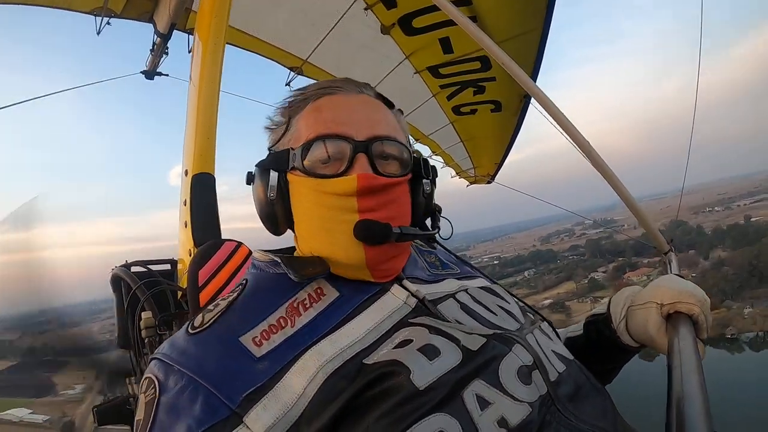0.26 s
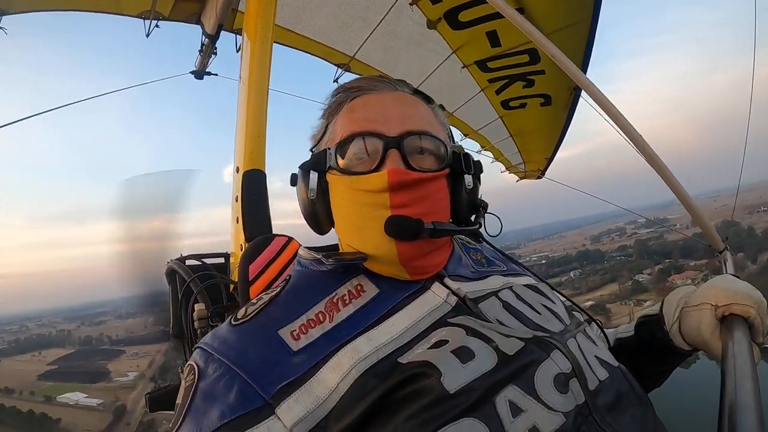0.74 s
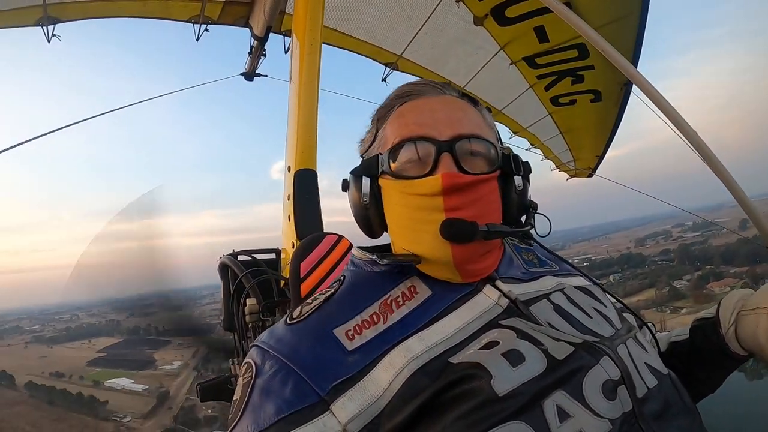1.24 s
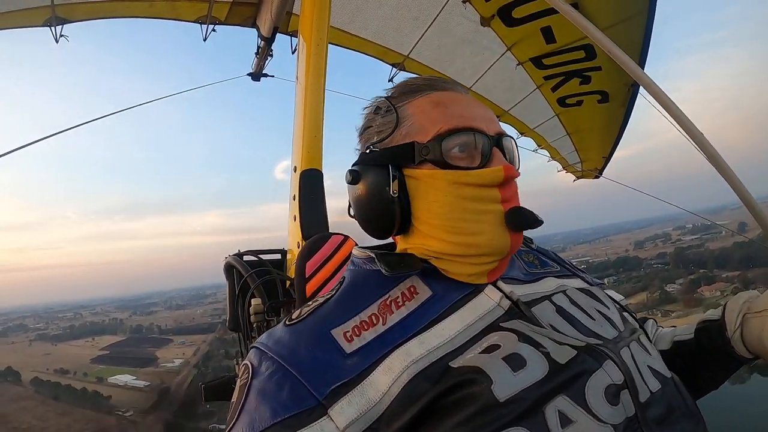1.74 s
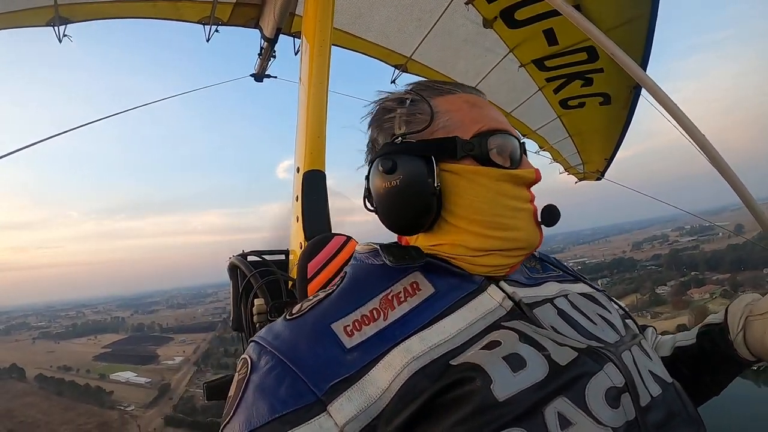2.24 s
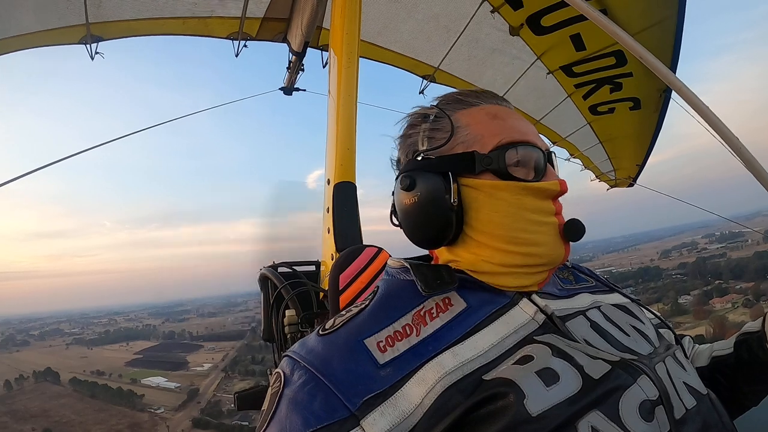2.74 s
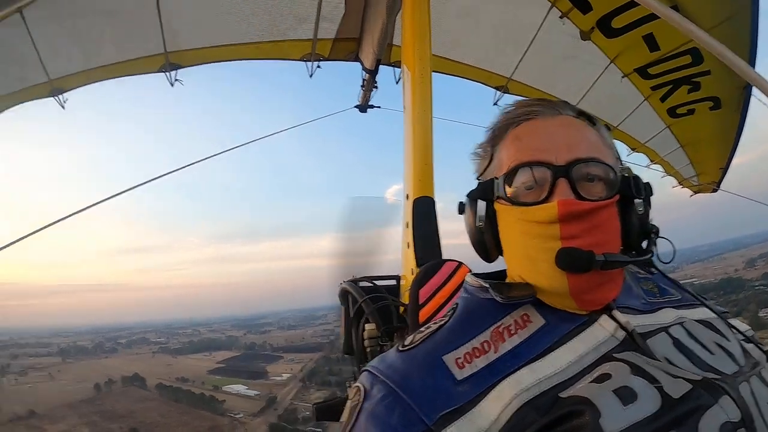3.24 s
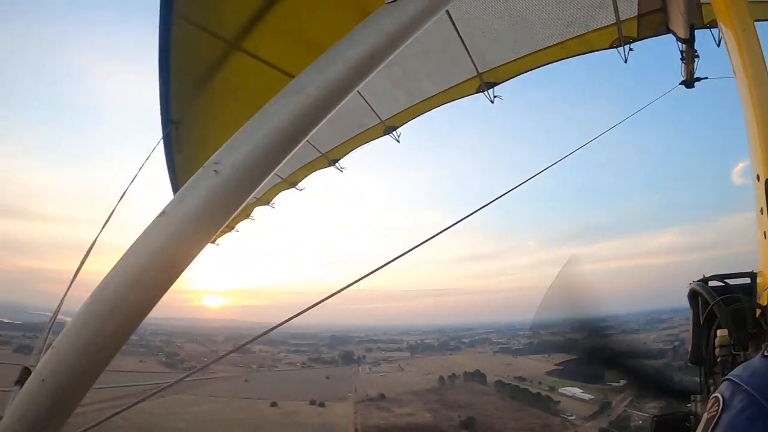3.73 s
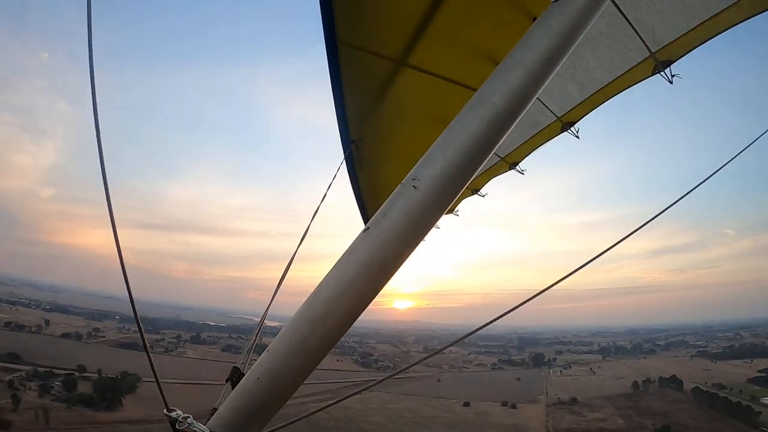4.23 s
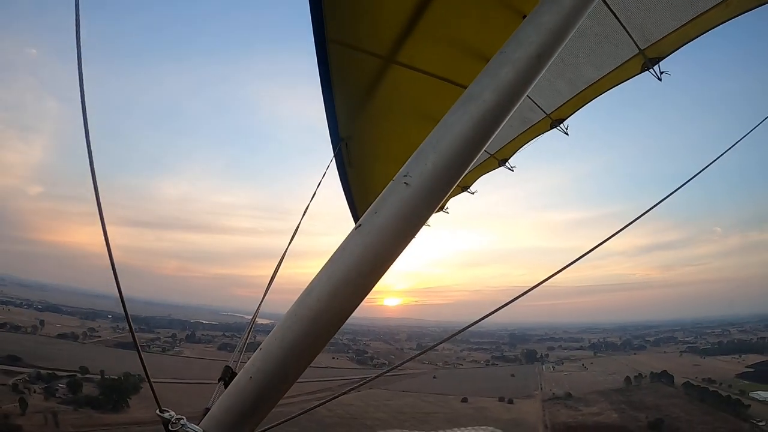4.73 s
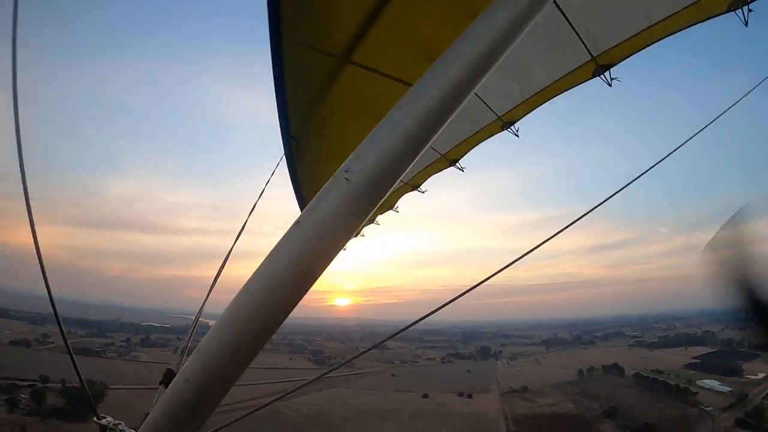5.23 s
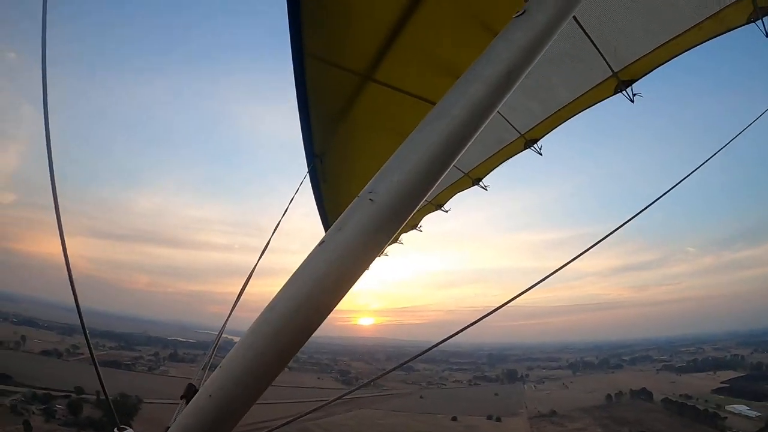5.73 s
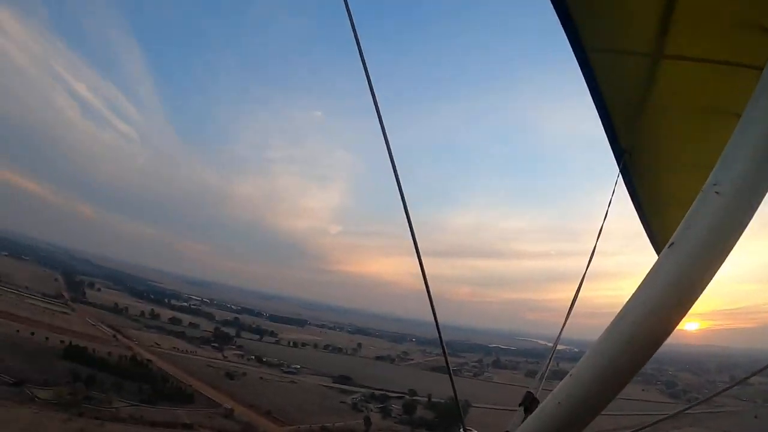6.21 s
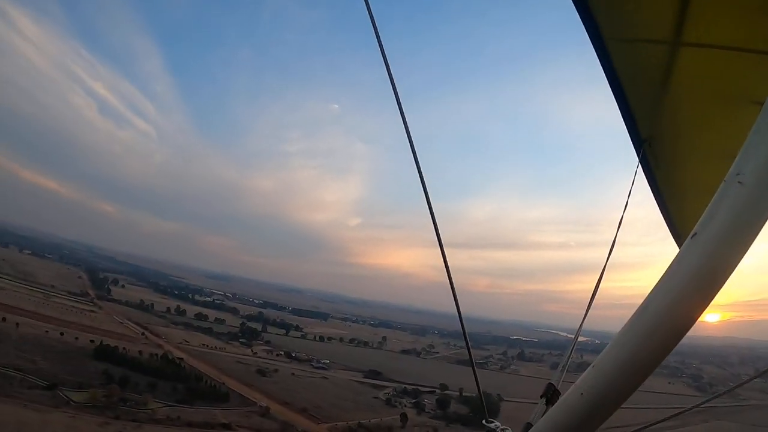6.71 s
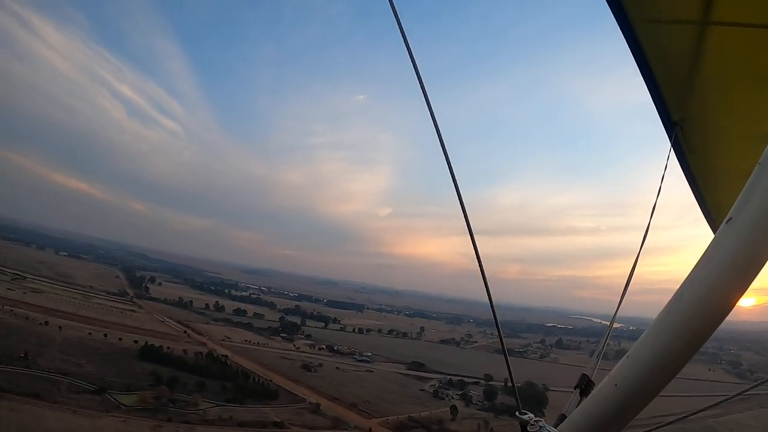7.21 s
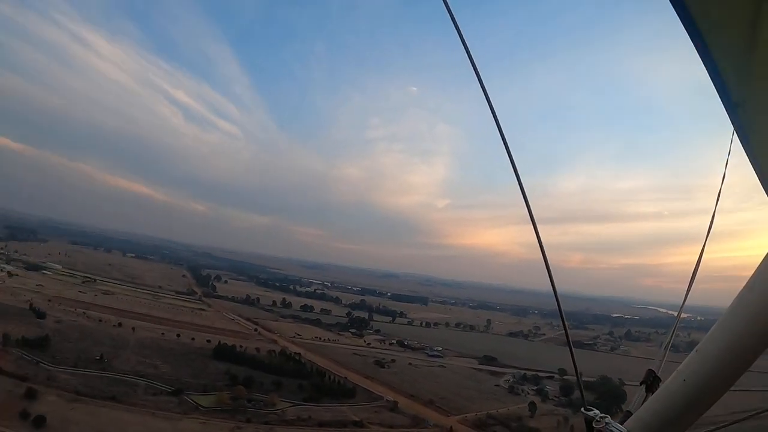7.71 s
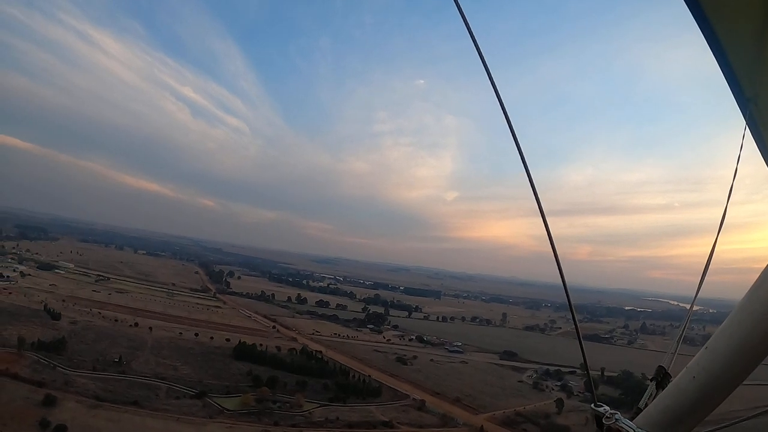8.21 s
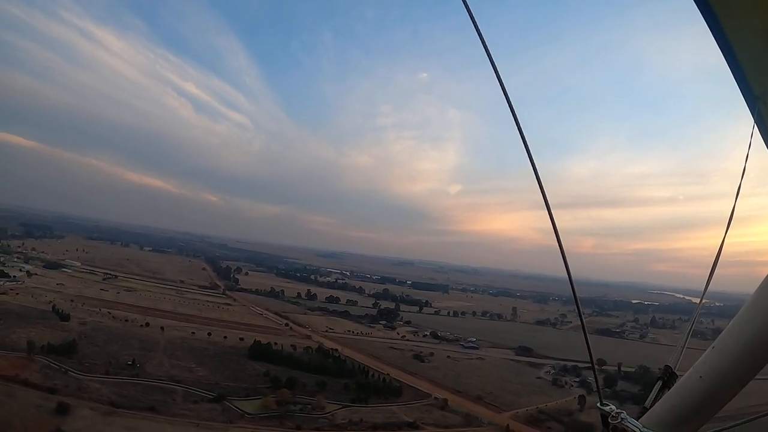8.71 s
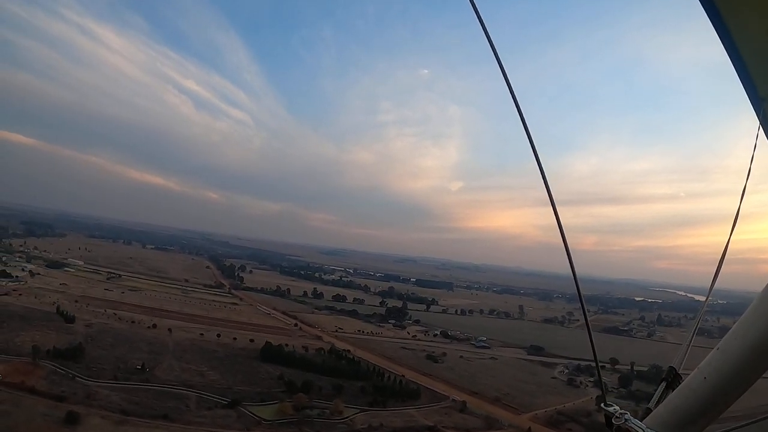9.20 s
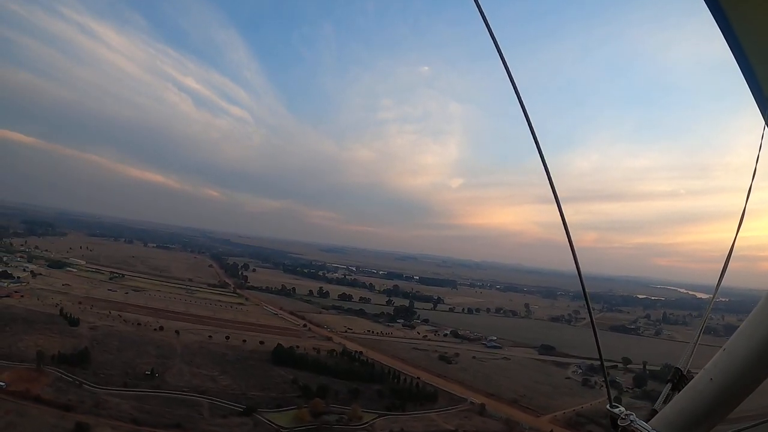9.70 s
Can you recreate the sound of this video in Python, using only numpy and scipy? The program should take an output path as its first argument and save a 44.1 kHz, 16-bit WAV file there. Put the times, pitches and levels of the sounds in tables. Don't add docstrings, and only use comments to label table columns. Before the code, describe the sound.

From 0 to about 10 seconds a two-stroke aircraft engine holds a smooth low hum near 100 hertz, sagging very slightly, with faint propeller tones. Over it, dense bassy wind roars and flutters on a bare hand-held camera microphone, with a wavering hollow howl around 160 hertz. Small dry mount ticks come in the first second, then a creaky cluster from 2.0 to 2.6, with more near 3.3 to 3.9. As the camera swings, tiny high whistles flick by at 3.5 to 4.0 and airy slot singing rises around 4.3 to 4.5. At 5.24 to 5.4 a hand rubs and bumps the housing, ending in the heaviest dull thud. Thin singing and short whistles follow until about 6.4, with ticks to 6.7. Then a breathy mid-pitched slot tone joins the drone, and the wind rush thins slightly toward the end, everything held level by gain control.

```python
import sys
import numpy as np
from scipy import signal
from scipy.fft import rfft, irfft, next_fast_len
from scipy.io import wavfile

SR = 44100
rng = np.random.default_rng(int(sys.argv[2]) if len(sys.argv) > 2 else 0)


def nominal_scale(level):
    x = np.asarray(level, float) / 20
    return 10 ** x


def store_wav(level_fs):
    pcm = np.round(np.clip(np.atleast_2d(level_fs), -1, 1) * 32767)
    wavfile.write(sys.argv[1], SR, pcm.T.astype(np.int16))


N = 438794

# time_s, heading_deg
HEADING = [(0, 3.2), (1, 18.4), (2, 26.6), (2.6, 41), (3.5, 50.6), (4, 62), (4.55, 86), (5, 94), (5.3, 94),
           (5.6, 108), (5.95, 131), (6.5, 138), (7, 122), (7.5, 140), (8, 152), (8.5, 158), (9, 173),
           (9.95, 174)]
BEARINGS = (0, 45, 90, 135, 180)
# time_s, flow_db (re cruise), blow_db (across the cavity)
FLOW = [(0, 1.5, -21), (0.5, 0.5, -15), (1.3, -0.5, -16), (1.58, 0.5, -21.5), (1.75, 1.5, -14.5),
        (3.2, 1, -17.5), (4.0, 2, -17), (4.55, 1, -11.5), (5.2, 2.5, -11.5), (5.45, 0.5, -19),
        (5.85, 0.5, -14), (6.45, 0.5, -14.5), (8.3, -0.5, -17), (8.52, -1.5, -10), (8.87, -1.5, -17.5),
        (9.32, -2.5, -21.5), (9.5, -4.5, -12), (9.95, -4.5, -17.5)]
# aft_db, rear_quarter_db, side_db, front_quarter_db, ahead_db
BUFFET_DB = (-26.5, -23, -19, -19.5, -22)
ROAR_DB = (-24.5, -24, -24, -22.5, -22.5)
RUSH_DB = (-28.5, -28, -28.5, -27, -26)
HISS_DB = (-42.5, -41.5, -43.5, -42.5, -41.5)
# pitch_hz, density_db
AIR_COLOUR = [(15, -27), (50, -8.5), (80, -7), (140, -2), (190, -12), (340, -22.5), (600, -21),
              (880, -26.5), (1600, -26.5), (2180, -41.5), (3500, -49.5), (7000, -55), (7700, -79),
              (16000, -93.5)]
# pitch_hz, width_hz, peak_db (over the colour)
PORTS = [(439.5, 90, 7), (720, 76, 1.5), (1115, 205, 9.5), (3003, 940, 9), (4183, 410, 10),
         (4870, 200, 6.5), (5350, 170, 5.5), (7440, 390, 3), (12300, 1900, 12.5)]
HOWL_HZ = (168, 167, 155, 153.75, 155.7)
# pitch_hz, width_hz, level_db
NARROW_SLOTS = [(4180, 350, 0), (4850, 280, -4), (5360, 250, -6), (7000, 500, -10)]
# peak_s, half_length_s, rise_db
SINGS = [
    (4.301, .06, 13),
    (4.48, 0.2, 14),
    (5.6, .6, 7),
    (6.049, 0.36, 10.5),
]
# start_s, length_s, start_hz, end_hz, level_db
WHISTLES = [(3.52, .065, 11400, 12500, -72), (3.605, .05, 12050, 12400, -72),
            (3.66, 0.045, 11450, 12300, -70), (3.705, .1, 12140, 10900, -76),
            (3.772, 0.13, 7320, 6880, -50.5), (3.997, 0.048, 5460, 5350, -47),
            (5.32, .03, 4800, 4980, -38.5), (5.985, 0.036, 5350, 5130, -46), (6.014, .04, 4880, 4803, -40),
            (5.437, .04, 5000, 4900, -55), (5.58, .03, 5400, 5350, -58), (5.881, 0.036, 5400, 5400, -54)]
# start_s, level_db, thud_hz, t60_s
KNOCKS = [
    (5.250, -12, 380, .02),
    (5.262, -8, 110, .08),
    (5.280, -5, 140, .06),
    (5.298, -9, 430, .015),
    (5.314, -2, 90, .06),
    (5.369, 2, 400, .015),
    (5.374, 8, 105, .06),
]
# start_s, peak_db, body_db (extra in the low modes)
TICKS = [(0.1, -29, 0), (0.5124, -27, -2), (0.757, -30, 0), (0.8637, -30, 0), (2.011, -20, 5),
         (2.0718, -20, 2), (2.0767, -14, 3), (2.1014, -30, 12), (2.15, -18, 0), (2.173, -27, 0),
         (2.2312, -16, -7), (2.306, -15, -3), (2.3574, -18, 1), (2.5266, -14, 1), (2.562, -25, 0),
         (2.572, -25, 0), (3.287, -28, 7), (3.3663, -27, 5), (3.5032, -24, 3), (3.849, -17.5, 5),
         (3.8602, -20.5, 4), (5.2485, -31, 3), (5.263, -32, 1), (5.277, -22.5, 5), (5.2953, -27, 4),
         (5.37, -23, 9), (6.2818, -23.5, -3), (6.392, -27, 4), (6.6994, -27, -2)]
# pitch_hz, level_db, t60_s
MOUNT_MODES = [(1150, 2, .014), (1550, 0, .011), (2000, -3, .009), (2500, -2, .016), (3110, -1, .019),
               (3750, -6, .015), (4350, -7, .015), (6300, -26, .006)]
# time_s, shaft_hz
SHAFT = [(0, 99.87), (1, 100.5), (2, 99.2), (3, 99.58), (4, 98.8), (5.5, 98), (9, 98.35), (9.95, 98.04)]
# multiple of the blade rate, level_db
BLADES = [(1, -29), (2, -33.5), (3, -39.5), (4, -45.5)]
# aft_db, rear_quarter_db, side_db, front_quarter_db, ahead_db
LOWER_ORDERS = [(-17, -15, -29.5, -19, -15), (-45.5, -49, -33.5, -27.5, -36),
                (-42.5, -31.5, -32.5, -25, -28), (-33, -31.5, -32, -34.5, -43)]
# order, aft_db, ahead_db
UPPER_ORDERS = [(5, -47.5, -47.5), (6, -42, -40), (7, -57.5, -40.5), (8, -40, -36), (10, -55.5, -43.5),
                (12, -47.5, -47), (14, -51.5, -58.5), (16, -52, -42), (18, -57, -58.5)]


def in_time(rows):
    s, *columns = np.transpose(rows)
    return [np.interp(np.arange(N) / SR, s, c) for c in columns]


def facing(pattern):
    return np.interp(in_time(HEADING)[0], BEARINGS, pattern)


def rms_one(x):
    return x / np.sqrt(np.mean(x ** 2) + 1e-20)


def drift(rate_hz):
    r = np.exp(-2 * np.pi * rate_hz / SR)
    return rms_one(signal.lfilter([1], [1, -2 * r, r * r], rng.standard_normal(N + SR))[SR:])


def ring(clicks, hz, t60):
    r, w = nominal_scale(-60 / (t60 * SR)), 2 * np.pi * hz / SR
    return signal.lfilter([0, np.sin(w)], [1, -2 * r * np.cos(w), r * r], clicks + 1e-18)


def narrow_noise(hz, width_hz):
    r, w = np.exp(-np.pi * width_hz / SR), 2 * np.pi * hz / SR
    zeros, poles = [1, 0, -1], [1, -2 * r * np.cos(w), r * r]
    once = signal.lfilter(zeros, poles, rng.standard_normal(N))
    return rms_one(signal.lfilter(zeros, poles, once))


def sing_db():
    t = np.arange(N) / SR
    return sum(db * np.maximum(1 - np.abs(t - s) / half, 0) for s, half, db in SINGS)


def airstream():
    flow_db, blow_db = in_time(FLOW)
    buffet_db = facing(BUFFET_DB) - 0.3 * (blow_db + 15)
    roar_db = facing(ROAR_DB) + 0.33 * flow_db
    rush_db = facing(RUSH_DB) + flow_db
    hiss_db = facing(HISS_DB) + 1.3 * flow_db + 0.15 * sing_db()
    size = next_fast_len(N)
    hz = np.maximum(np.arange(size // 2 + 1) * SR / size, 1)
    colour_hz, level_db = np.transpose(AIR_COLOUR)
    colour_db = np.interp(np.log(hz), np.log(colour_hz), level_db)
    for centre_hz, width_hz, peak_db in PORTS:
        colour_db += peak_db / (1 + (2 * (hz - centre_hz) / width_hz) ** 2)
    noise = rfft(rng.standard_normal(size)) * nominal_scale(colour_db)
    above = [1 / (1 + (edge_hz / hz) ** 6) for edge_hz in (190, 900, 2000)]
    shares = [1 - above[0], above[0] - above[1], above[1] - above[2], above[2]]
    levels_db = (buffet_db, roar_db, rush_db, hiss_db)
    typical_db = (-24, -25, -29, -43)
    flutter = drift(4.1)
    gusts_db = (0.68 * drift(0.88), 1.2 * drift(16), 1.0 * drift(23) + 0.15 * flutter, 0.44 * flutter)
    out = 0
    for share, db, usual_db, gust_db in zip(shares, levels_db, typical_db, gusts_db):
        out = out + irfft(noise * share, size)[:N] * nominal_scale(db - usual_db + gust_db)
    return nominal_scale(-19.5) * out / np.std(irfft(noise, size))


def howl():
    width_hz = 24.2
    centre_hz = facing(HOWL_HZ) + 2.97 * drift(2.52)
    lowpass = signal.butter(3, width_hz / 2, fs=SR, output="sos")
    slow = signal.sosfilt(lowpass, rng.standard_normal((2, N + SR)))[:, SR:]
    swing = slow[0] + 1j * slow[1]
    swing = swing / (np.abs(swing) / np.std(swing) + 0.31) ** 0.16
    phase = 2 * np.pi * np.cumsum(centre_hz) / SR
    blow_db = in_time(FLOW)[1]
    return nominal_scale(blow_db - 1.5) * rms_one(np.real(swing * np.exp(1j * phase)))


def slots():
    past_deg = np.clip(in_time(HEADING)[0] - 136, 0, 11.8)
    wide_db = -41 + 0.7462 * past_deg
    narrow_db = -64.5 + sing_db()
    out = nominal_scale(wide_db) * narrow_noise(hz=600, width_hz=70)
    for hz, width_hz, db in NARROW_SLOTS:
        out += nominal_scale(narrow_db + db + 3.5 * drift(4.8)) * narrow_noise(hz, width_hz)
    return out


def whistles():
    out = np.zeros(N)
    for s, length, start_hz, end_hz, db in WHISTLES:
        n, at = round(length * SR), round(s * SR)
        phase = 2 * np.pi * np.cumsum(np.linspace(start_hz, end_hz, n)) / SR
        out[at:at + n] += np.sqrt(2) * nominal_scale(db) * np.hanning(n) ** .5 * np.sin(phase)
    return out * (.8 + .6 * drift(60))


def rub():
    from_s, to_s = 5.235, 5.38
    lowpass = signal.butter(2, 330, fs=SR, output="sos")
    dull = rms_one(signal.sosfilt(lowpass, rng.standard_normal(N)))
    touch = np.interp(np.arange(N) / SR, (from_s, from_s + .02, to_s - .01, to_s), (0, 1, 1, 0))
    return nominal_scale(-24 + 4 * drift(40)) * touch * dull


def knocks():
    out = np.zeros(N)
    for s, db, thud_hz, t60 in KNOCKS:
        push = np.zeros(N)
        push[round(s * SR)] = nominal_scale(db)
        out += ring(push, thud_hz, t60) + 0.36 * ring(push, 520., 0.0085)
    return out


def ticks():
    grip_damping, body_top_hz = .75, 2200
    out = np.zeros(N)
    s, peak_db, body_db = np.transpose(TICKS)
    at = np.round(s * SR).astype(int)
    spread = rng.standard_normal((len(TICKS), len(MOUNT_MODES)))
    late = rng.integers(0, 50, (len(TICKS), len(MOUNT_MODES)))
    for m, (hz, level_db, t60) in enumerate(MOUNT_MODES):
        clicks = np.zeros(N)
        click_db = peak_db + level_db + body_db * (hz < body_top_hz) - 3.5 + 1.2 * spread[:, m]
        clicks[at + late[:, m]] = nominal_scale(click_db) * (-1) ** m
        out += ring(clicks, hz, grip_damping * t60)
    soft = np.hanning(7)[1:-1] / 3
    return signal.lfilter(soft, [1], out) * nominal_scale(2.5)


def propeller():
    passes_per_turn = .8645
    turn = 2 * np.pi * passes_per_turn * np.cumsum(in_time(SHAFT)[0]) / SR + 0.38 * drift(1.3)
    out = 0
    for k, db in BLADES:
        out = out + np.sqrt(2) * nominal_scale(db + 1.1 * drift(5.7)) * np.sin(round(k) * turn)
    return out


def engine():
    shaft_hz = in_time(SHAFT)[0]
    ahead = np.interp(in_time(HEADING)[0], (62, 138), (0, 1))
    turn = 2 * np.pi * np.cumsum(shaft_hz) / SR + .03 * drift(4)
    levels = [(k + 1, facing(pattern_db)) for k, pattern_db in enumerate(LOWER_ORDERS)]
    levels += [(k, aft_db + ahead * (ahead_db - aft_db)) for k, aft_db, ahead_db in UPPER_ORDERS]
    waver = [drift(2.7), drift(2.8)]
    out = 0
    for k, db in levels:
        tone = np.sin(round(k) * turn + rng.uniform(0, 2 * np.pi))
        out = out + np.sqrt(2) * nominal_scale(db + 1.3 * waver[int(k) % 2]) * tone
    return out


def scene():
    housing = signal.cheby2(8, 60, 8000, fs=SR, output="sos")
    contact = signal.sosfilt(housing, ticks() + knocks())
    air = engine() + propeller() + airstream() + howl() + slots() + whistles()
    return (air + contact + signal.sosfilt(housing, rub()))[None]


def limiter_db(x, threshold_db, ratio, release_db_s, attack_hz):
    climb = release_db_s * np.arange(N) / SR
    held_db = np.maximum.accumulate(20 * np.log10(np.abs(x) + 1e-6) + climb) - climb
    cut_db = -np.maximum(held_db - threshold_db, 0) * (1 - 1 / ratio)
    r = np.exp(-2 * np.pi * attack_hz / SR)
    return signal.lfilter([1 - r], [1, -r], cut_db)


def roll_off(x):
    return signal.sosfilt(signal.butter(12, 15700, fs=SR, output="sos"), x)


def record(dry):
    x = nominal_scale(1.5) * dry
    lowpass = signal.butter(2, 230, fs=SR, output="sos")
    bass = signal.sosfiltfilt(lowpass, x)
    guard_db = limiter_db(bass[0], threshold_db=-11.5, ratio=2.8, release_db_s=80.0, attack_hz=40.0)
    x = x - bass + nominal_scale(3.0 + guard_db) * bass
    x = x * nominal_scale(limiter_db(x[0], threshold_db=-3.5, ratio=3.7, release_db_s=91.0, attack_hz=150.0))
    x = 0.9 * np.tanh(x / 0.95)
    settle = np.clip((N - np.arange(N)) / 300, .3, 1)
    return roll_off(nominal_scale(-.5) * x * settle)


dry = scene()
out = record(dry)
store_wav(out)
```